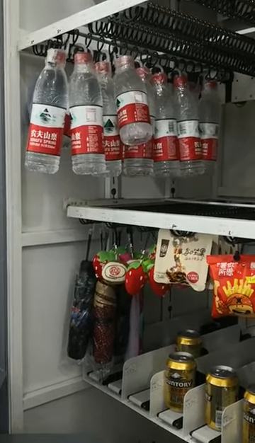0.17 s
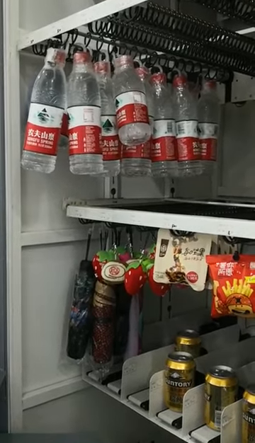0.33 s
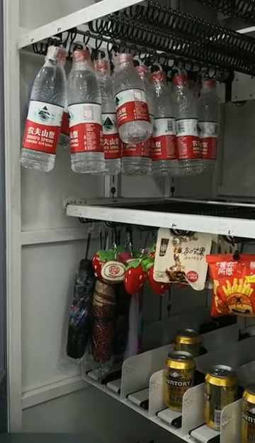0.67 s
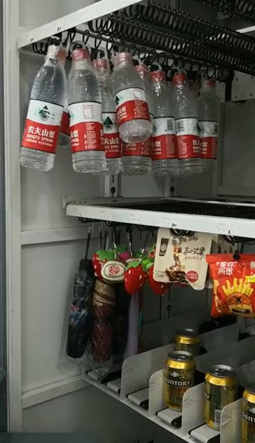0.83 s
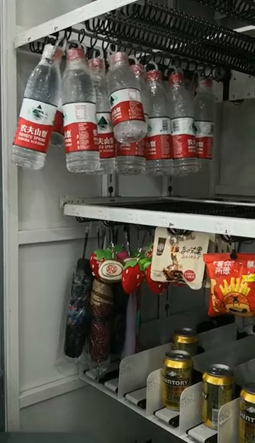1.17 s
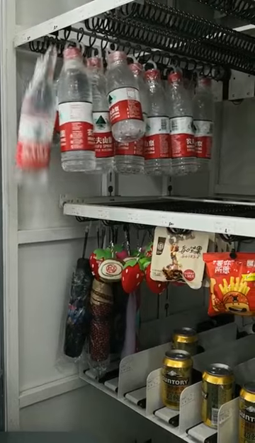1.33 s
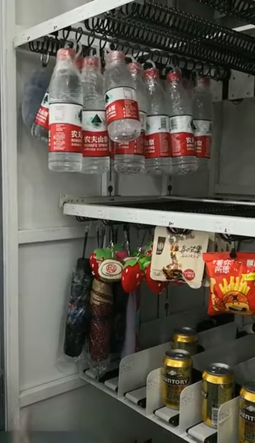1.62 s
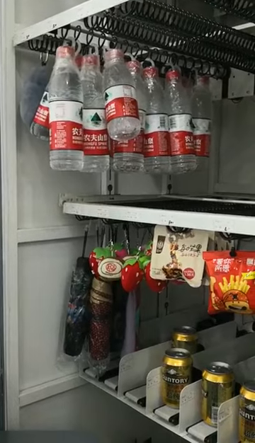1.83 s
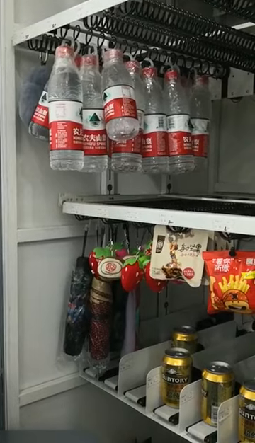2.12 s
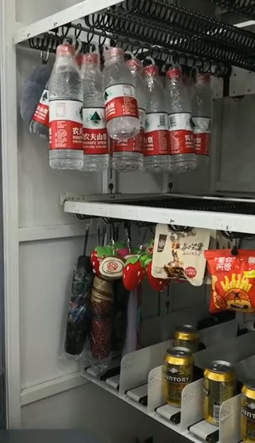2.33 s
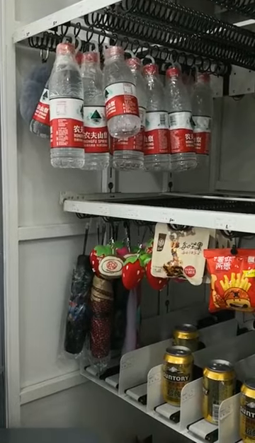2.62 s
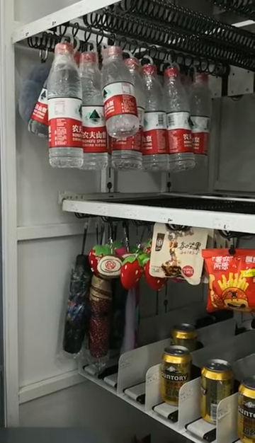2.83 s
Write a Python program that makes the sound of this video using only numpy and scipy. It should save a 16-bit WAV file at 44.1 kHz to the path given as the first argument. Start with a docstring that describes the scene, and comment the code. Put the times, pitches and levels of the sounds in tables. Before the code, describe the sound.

A vending machine's small geared motor whirs steadily with a brief squeak, then a filled plastic bottle crashes into the sheet-metal bin and tumbles; the motor stops and restarts. Close stereo microphone, muffled top treble, boxy metal cabinet.

```python
"""A small geared motor whirs in a vending machine: sines locked to its shaft, gear noise, brush hiss.
The wire spiral it turns squeaks, a tone gliding along a curve of pitch.
A bottle drops into the sheet-metal bin, bounces and tumbles: each blow excites decaying modes and noise.
The motor cuts out during the crash and spins up again with a growl as the bottle settles.
A faint, uneven rumble of filtered noise lies beneath."""
import sys
import numpy as np
from scipy import signal
from scipy.fft import rfft, irfft, next_fast_len
from scipy.io import wavfile
from scipy.ndimage import uniform_filter1d, map_coordinates

SR = 44100
rng = np.random.default_rng(int(sys.argv[2]) if len(sys.argv) > 2 else 0)


def file_out(sig):
    """Save sig as 16-bit WAV at sys.argv[1]."""
    # one column per channel
    cols = np.atleast_2d(sig).T
    # limit, then scale
    lim = np.clip(cols, -1, 1)
    pcm = np.round(lim * 32767).astype(np.int16)
    wavfile.write(sys.argv[1], SR, pcm)


N = 131859
T = np.arange(N) / SR  # time of every sample in seconds


def amp(db):
    """Amplitude ratio: 20 dB is a factor of ten."""
    return np.exp(np.asarray(db) * (np.log(10) / 20))


def unit(x):
    """Normalization: scale to rms 1."""
    return x / np.sqrt(np.mean(x ** 2) + 1e-20)


def along(points, hz):
    """Interpolation of (Hz, value) points on a logarithmic frequency axis."""
    f, value = np.transpose(points)
    return np.interp(np.log(hz + 1), np.log(f + 1), value)


def colour(points):
    """Spectral envelope: the gain response of a (Hz, dB) table."""
    return lambda hz: amp(along(points, hz))


def curves(rows):
    """Linear interpolation in time: one curve for each column after the seconds."""
    seconds, *columns = np.transpose(rows)
    return [np.interp(T, seconds, column) for column in columns]


def wobble(rate):
    """Band-limited randomness: a smooth spline through random knots, rate of them a second."""
    coarse = T[::8]
    knots = rng.standard_normal(int(N * rate / SR) + 4)
    return np.interp(T, coarse, map_coordinates(knots, [coarse * rate]))


def filtered(x, response):
    """Linear filtering: multiply the spectrum by a response of frequency."""
    m = next_fast_len(N + SR // 2)
    return irfft(rfft(x, m) * response(np.fft.rfftfreq(m, 1 / SR)), m)[..., :N]


def pan(db):
    """Level difference between ears: left gains db, right loses it."""
    return amp([[db], [-db]])


def texture(response, width, spiky=0):
    """Superposed tiny contacts: stereo noise of rms 1; spiky spreads their sizes, 0 is a smooth rush."""
    ticks = rng.standard_normal((2, N)) * np.exp(spiky * wobble(900))

    def mid_side(hz):
        turn = np.arctan(amp(along(width, hz)))
        return response(hz) * np.array([np.cos(turn), np.sin(turn)])

    mid, side = filtered(ticks, mid_side)
    return unit(np.array([mid + side, mid - side]))


def tone(phase, rough, rate):
    """Narrow-band modulation: a sine of about rms 1 whose size and phase waver."""
    in_phase = (1 + rough * wobble(rate)) * np.sin(phase)
    quadrature = rough * wobble(rate) * np.cos(phase)
    return np.sqrt(2) * (in_phase + quadrature) / np.sqrt(1 + 2 * rough ** 2)


def whistle(rows, rough, rate):
    """Frequency modulation: a rough tone whose phase integrates a (s, Hz, dB) curve."""
    hz, db = curves(rows)
    sounding = (T > rows[0][0]) & (T < rows[-1][0])
    return sounding * amp(db) * tone(2 * np.pi * np.cumsum(hz) / SR, rough, rate)


RISE_S = 0.0079  # time constant of a blow's rise


def strike(s, t60, rise_s=RISE_S):
    """Exponential decay: the envelope of one blow, a quick rise and 60 dB of fall per t60."""
    t = np.maximum(T - s, 0)
    return (1 - np.exp(-t / rise_s)) * amp(-60 * t / t60)


def patchy(x, depth_db):
    """Spectro-temporal modulation: smoothed random gain over time and frequency."""
    spectra = signal.stft(x, nperseg=512)[2]
    field = rng.standard_normal(spectra.shape[1:])
    field = uniform_filter1d(field, size=3, axis=0)  # over frequency
    field = uniform_filter1d(field, size=7, axis=1)  # over time
    return unit(signal.istft(spectra * amp(depth_db * unit(field)), nperseg=512)[1][:, :N])


PORT_PHASE = 0.91  # radians between left and right for the motor's tones


def shaft_tone(phase, levels_db, rough):
    """Interaural phase: one motor tone, at its own level and phase on the left and right."""
    start = rng.uniform(0, 2 * np.pi)
    return np.array([amp(db) * tone(phase + start + port * PORT_PHASE, rough, rate=45)
                     for port, db in enumerate(levels_db)])


# Tones of the turning shaft. Each row: multiple of the shaft rate (rounded to a half when played),
# left level in dB, right level in dB, before the load.
SHAFT_TONES = [(1, -56, -56.5), (4, -75.5, -74), (7, -60.5, -61), (7.5, -58, -59.5), (9, -62, -56),
               (11, -57.5, -56.5), (12, -57.5, -56.5), (14, -60, -54.5), (15, -49, -59.5), (17, -46, -46),
               (18, -49, -45), (19, -51.5, -49), (21, -56, -47.5), (22, -58, -58.5), (25, -58.5, -57.5),
               (39.78, -41, -37)]
# The clean tone of the armature slots, one row: multiple of the shaft rate, left and right level in dB.
SLOT_TONE = (10, -44.5, -38.5)
# Level of these tones, following the load. Each row: time in seconds, level in dB.
LOAD = [(0, -2), (.55, -0.5), (.9, -1), (1.3, 0), (1.45, -2), (1.65, 1), (2.65, -5.5), (2.8, -4.5),
        (3, -6.5)]
TONE_ROUGH, SLOT_ROUGH = .48, .17


def shaft_tones(shaft):
    """Harmonic series: sines at multiples and half multiples of the shaft rate."""
    tones = shaft_tone(SLOT_TONE[0] * shaft, SLOT_TONE[1:], SLOT_ROUGH)
    for multiple, *levels_db in SHAFT_TONES:
        tones = tones + shaft_tone(np.round(2 * multiple) / 2 * shaft, levels_db, TONE_ROUGH)
    return amp(curves(LOAD)[0]) * tones


# Relative level of the gear whine. Each row: time in seconds, level in dB.
WHINE_LEVEL = [(0, 0.5), (.13, -3.5), (.4, 0.5), (.68, 1.5), (.82, 0.5), (.87, -6.5), (.96, 2.5),
               (1.25, 1.5), (1.45, -7), (1.58, 0), (1.75, -5), (2.62, 2.5), (2.72, -6.5), (2.81, 1.5),
               (3, -5.5)]
MESH_ORDER, MESH_DB, MESH_ROUGH = 20, (-35, -32), .2  # multiple of the shaft rate; left, right dB
GEAR_RATIO = .283  # turns of the next wheel per shaft turn
GEAR_SWAY, GEAR_SWING, SHAFT_SWING = .52, .17, .12  # phase in radians; two depths of level swing
WHINE_ONSET = 5  # the whine grows with this power of the speed


def gear_whine(shaft, running):
    """Tooth meshing: a tone whose phase and size an off-centre wheel modulates."""
    wheel = GEAR_RATIO * shaft + .5 * wobble(16)
    mesh = shaft_tone(MESH_ORDER * shaft + GEAR_SWAY * np.sin(wheel), MESH_DB, MESH_ROUGH)
    swing = 1 + GEAR_SWING * np.cos(wheel) + SHAFT_SWING * np.sin(2 * shaft)
    return running ** WHINE_ONSET * amp(curves(WHINE_LEVEL)[0]) * mesh * swing


# Spectrum of the gear noise. Each row: frequency in Hz, relative density in dB.
GEARS = [(300, -35), (1000, -34), (1350, -22.5), (1650, -4.5), (1950, -9.5), (2300, -10.5), (2800, -4.5),
         (3250, 2.5), (3480, -7), (3750, -5), (4200, -7), (7000, -20.5)]
# Stereo width of the motor's noise. Each row: frequency in Hz, side against mid in dB.
MOTOR_WIDTH = [(60, -29.5), (120, -29), (250, -15.5), (500, 5.5), (1000, 0), (2020, 0), (4090, 2.5),
               (8270, -8)]
GEARS_DB = -33  # before flutter, load and pan


def gear_noise():
    """Random tooth contact: coloured noise whose level flutters and follows the load."""
    flutter = amp(GEARS_DB + 1.1 * wobble(60))
    return amp(curves(LOAD)[0]) * flutter * texture(colour(GEARS), MOTOR_WIDTH, spiky=0.05)


# Moments when the brush hiss drops out briefly. Each row: time in seconds, depth in dB.
HISS_DIPS = [(.205, 6), (.345, 13.5), (.538, 3.5), (.622, 10.5), (.918, 7.5), (1.2, 8.5), (1.605, 10),
             (1.668, 7)]
DIP_S = 0.008  # half-width of a dip, to 1/e of its depth


def brush_contact():
    """Amplitude modulation: the gain of the brush hiss flutters, with brief dropouts."""
    dips_db = sum(depth * np.exp(-((T - s) / DIP_S) ** 2) for s, depth in HISS_DIPS)
    return amp(1.3 * np.tanh(wobble(70)) + 0.7 * np.tanh(wobble(400)) - dips_db)


# Spectrum of the brush hiss. Each row: frequency in Hz, relative density in dB.
BRUSH = [(1500, -45.5), (3000, -21), (4000, -22.5), (4500, -8.5), (4850, -1.5), (5250, -9), (6000, -6),
         (6500, -4.5), (6750, -3.5), (6950, 6), (7150, 3.5), (7350, 1), (7600, -6.5)]
BRUSH_DB = -25  # before flutter and pan


def brush_hiss():
    """Sliding friction: coloured noise under the varying brush contact."""
    return amp(BRUSH_DB) * brush_contact() * texture(colour(BRUSH), MOTOR_WIDTH, spiky=0.053)


# The motor's speed when powered. Each row: time in seconds, shaft speed in Hz before jitter.
SPEED = [(0, 162.2), (.2, 161.5), (.42, 161.1), (.58, 161.5), (.87, 160.2), (.97, 160.9), (1.2, 161),
         (1.4, 161.8), (1.7, 163.5), (2.8, 163.5), (3, 162.8)]
STOP_S, RESTART_S = 1.93, 2.592
COAST_S, SPIN_UP_S, SWITCH_S = 0.096, 0.028, 0.008  # time constants: slowing, speeding up, noise return
JITTER_HZ, HISS_PAN_DB = .12, -1


def motor():
    """Rotational inertia: speed falls and rises exponentially, and every tone follows the shaft angle."""
    since = np.maximum(T - RESTART_S, 0)
    coast = np.exp(-np.maximum(T - STOP_S, 0) / COAST_S)
    running = coast + 1 - np.exp(-since / SPIN_UP_S)
    powered = coast + 1 - np.exp(-since / SWITCH_S)
    shaft_hz = running * (curves(SPEED)[0] + JITTER_HZ * wobble(40))
    shaft = 2 * np.pi * np.cumsum(shaft_hz) / SR
    tones = running * (shaft_tones(shaft) + gear_whine(shaft, running))
    return tones + powered * (gear_noise() + brush_hiss()) * pan(HISS_PAN_DB)


# Spectrum of the starting growl. Each row: frequency in Hz, relative density in dB.
STRAIN = [(500, -31), (1200, -12.5), (1650, -4.5), (2200, -1.5), (3000, -2), (3700, -17.5), (7000, -33.5)]
# A rough whistle that falls as the motor spins up.
# Each row: time in seconds, frequency in Hz, level in dB before the jerks.
RESTART_WHISTLE = [(2.595, 1943, -41), (2.625, 1720, -37), (2.652, 1597, -31), (2.668, 1405, -45.5),
                   (2.73, 1160, -48)]
STRAIN_DB, STRAIN_T60 = -24.5, 0.4  # before envelope and jerks; decay in seconds
STRAIN_PULSE_HZ, STRAIN_PULSE = 98, 0.45  # the teeth take up the load in jerks: mean rate, depth


def strain():
    """Periodic loading: the gears growl in jerks as the motor starts again, with a falling whistle."""
    jerks = 1 + STRAIN_PULSE * np.sin(2 * np.pi * STRAIN_PULSE_HZ * T + wobble(40))
    envelope = amp(STRAIN_DB) * strike(RESTART_S, STRAIN_T60, rise_s=.03)
    growl = envelope * texture(colour(STRAIN), MOTOR_WIDTH, spiky=.25)
    return jerks * (growl + whistle(RESTART_WHISTLE, rough=1.2, rate=350))


# Spiral squeak: one long slip, then two short chirps.
# Each row: time in seconds, frequency in Hz, level in dB.
SQUEAK = [(.62, 1975, -62), (.69, 1931, -41), (.73, 1933, -38), (.765, 1942, -33.5), (.79, 1950, -39),
          (.813, 1965, -36.5), (.826, 1965, -55), (.838, 1945, -34), (.855, 2005, -43), (.876, 1985, -36.5),
          (.895, 1960, -62)]


def squeak():
    """Frictional tone: the turning spiral rubs on a hanger."""
    return whistle(SQUEAK, rough=.15, rate=70)


TAIL_T60 = 1.224  # seconds, the cabinet's echo


def shaking(times, levels_db, t60, echo_db):
    """Energy addition: what the blows leave in the machine, with the cabinet's longer echo."""
    energy = sum(amp(2 * db) * (strike(s, t60) ** 2 + amp(2 * echo_db) * strike(s, TAIL_T60) ** 2)
                 for s, db in zip(times, levels_db))
    return np.sqrt(energy)


# Cabinet panels. Each row: frequency in Hz, relative level in dB, t60 in seconds.
PANELS = [(44.44, -0.5, .85), (56.8, -2, 0.59), (71.9, -0.5, 0.5), (89.2, -4, 0.61)]
BOOM_SCATTER_DB = 1.2


def boom(times, levels_db):
    """Modal excitation: every blow starts the low panel modes afresh as decaying sines."""
    return sum(amp(db + level + rng.normal(0, BOOM_SCATTER_DB))
               * strike(s, t60) * np.sin(2 * np.pi * hz * (T - s))
               for s, db in zip(times, levels_db) for hz, level, t60 in PANELS)


# Bin resonances. Each row: centre in Hz, width in Hz, relative level in dB.
BIN = [(118, 14, -0.5), (163, 20, 0.5), (205.3, 28, -3), (289.6, 32, -5), (343.2, 18, -1.5),
       (438, 28, -9.5), (507, 29, -8.5), (720, 11, -3.5)]


def bin_response(f):
    """Resonance: a sum of second-order band-passes of alternating sign."""
    return sum((-1) ** k * amp(db) * 1j * f * w / (c * c - f * f + 1j * f * w)
               for k, (c, w, db) in enumerate(BIN))


# Ring of bin and racks at every blow. Each row: frequency in Hz, relative level in dB, t60 in seconds.
RINGS = [(517, -14.5, 0.66), (732, -17.5, 0.44), (1750, -17.5, 0.17), (2140, -14.5, 0.75),
         (2720, -19, 0.42), (2809, -16, .4)]


def ringing(times, levels_db):
    """Free vibration: metal modes, struck anew by every blow with random size and phase."""
    out, t = np.zeros((2, N + SR)), np.arange(SR // 2) / SR
    for s, db in zip(times, levels_db):
        for hz, level, t60 in RINGS:
            size = amp(db + level + rng.normal(0, 1.8, (2, 1)))
            phase = rng.uniform(0, 2 * np.pi, (2, 1))
            envelope = (1 - np.exp(-t / RISE_S)) * amp(-60 * t / t60)
            start = int(s * SR)
            out[:, start:start + len(t)] += size * envelope * np.sin(2 * np.pi * hz * t + phase)
    return out[:, :N]


# Bottle blows. Each row: time in seconds, then relative boom, thud, clatter and crackle levels in dB.
BLOWS = [(1.693, -42, -34, -26, -37), (1.709, -25, -25, -19, -20.5), (1.722, -44.5, -23, -17.5, -23),
         (1.785, -27, -16.5, -16.5, -25.5), (1.826, -25, -22.5, -17, -21), (1.892, -28.5, -18.5, -19, -39),
         (1.935, -27.5, -21.5, -28, -54), (1.985, -37, -18.5, -20.5, -28.5),
         (2.044, -17.5, -19, -19.5, -27.5), (2.078, -28, -25, -22, -26.5), (2.124, -20, -19, -27, -50.5),
         (2.192, -16, -22, -24, -34.5), (2.229, -31.5, -24, -18.5, -23.5), (2.251, -27, -18, -20, -30),
         (2.289, -32, -20.5, -33.5, -40.5), (2.374, -26.5, -21.5, -26.5, -48),
         (2.41, -42, -26.5, -37.5, -55), (2.496, -24.5, -39, -53, -50), (2.588, -22, -28, -40, -51),
         (2.622, -38, -25, -32.5, -49), (2.72, -32.5, -40, -38.5, -57), (2.838, -32, -42, -42.5, -57)]
# Spectrum of the thud. Each row: frequency in Hz, relative density in dB.
THUD = [(40, -39), (110, -8), (200, -2.5), (340, -6.5), (450, -11), (900, -13.5), (2000, -35)]
# Spectrum of the rack clatter. Each row: frequency in Hz, relative density in dB.
CLATTER = [(150, -20.5), (450, -4), (750, -4.5), (1150, -3), (1500, 0), (1800, 1.5), (2500, 1.5),
           (3200, -2.5), (4800, -10.5), (5400, -16), (7500, -32.5)]
# Spectrum of the plastic crackle. Each row: frequency in Hz, relative density in dB.
CRACKLE = [(1500, -36), (3000, -12), (4000, 2), (4900, 0.5), (5300, -4), (6400, -3), (7200, 4.5),
           (7600, -5)]
# Stereo width of the crash. Each row: frequency in Hz, side against mid in dB.
CRASH_WIDTH = [(60, -22.5), (100, -36.5), (180, -24), (310, -5.5), (540, 5.5), (930, 2), (1600, -0.5),
               (2770, 1), (4780, -0.5), (8270, -3)]
# gains on top of the levels of the blows
BIN_DB, THUD_DB, CLATTER_DB, CRACKLE_DB, CRASH_PAN_DB = -2, -2.5, 2.5, 5.5, -1
THUD_T60, CLATTER_T60, CRACKLE_T60 = 0.34, 0.47, 0.31  # seconds
THUD_ECHO_DB, CLATTER_ECHO_DB, CRACKLE_ECHO_DB = -7.5, -9, -14  # against the direct part
PATCHY_DB = 2.43  # depth of the rattle's random unevenness over time and frequency


def crash():
    """Impact: each blow booms the panels, thuds in the bin, rattles the racks and crackles the plastic."""
    times, boom_db, thud_db, clatter_db, crackle_db = np.transpose(BLOWS)
    bin_noise = amp(BIN_DB) * texture(bin_response, CRASH_WIDTH, spiky=.4)
    thud_noise = amp(THUD_DB) * texture(colour(THUD), CRASH_WIDTH)
    thud = shaking(times, thud_db, THUD_T60, THUD_ECHO_DB) * (bin_noise + thud_noise)
    rattle = patchy(texture(colour(CLATTER), CRASH_WIDTH, spiky=0.15), PATCHY_DB)
    clatter = amp(CLATTER_DB) * shaking(times, clatter_db, CLATTER_T60, CLATTER_ECHO_DB) * rattle
    plastic = texture(colour(CRACKLE), CRASH_WIDTH, spiky=0.11)
    crackle = amp(CRACKLE_DB) * shaking(times, crackle_db, CRACKLE_T60, CRACKLE_ECHO_DB) * plastic
    bright = (clatter + crackle + ringing(times, clatter_db)) * pan(CRASH_PAN_DB)
    return boom(times, boom_db) + thud + bright


# Sharp cracks of the bottle wall.
# Each row: time in seconds, body level in dB, bright edge level in dB, before envelope and pan.
CRACKS = [(1.71, -12.5, -24), (1.832, -24, -7.5), (1.899, -20, -24), (1.962, -19.5, -39),
          (2.02, -18.5, -29), (2.165, -21, -29.5), (2.082, -16, -26.5), (2.255, -17.5, -21.5),
          (2.296, -22.5, -17.5), (2.42, -18.5, -41.5)]
CRACK_T60, CRACK_RISE_S = .11, 0.0041


def cracks():
    """Buckling: the bottle wall gives brief noise bursts during the tumble."""
    body = texture(colour(CLATTER), CRASH_WIDTH, spiky=.2)
    edge = texture(colour(CRACKLE), CRASH_WIDTH, spiky=0.18)
    bursts = sum(strike(s, CRACK_T60, CRACK_RISE_S) * (amp(body_db) * body + amp(edge_db) * edge)
                 for s, body_db, edge_db in CRACKS)
    return pan(CRASH_PAN_DB) * bursts


# Knocks that sound one panel or the bottle itself.
# Each row: start in seconds, frequency in Hz, level in dB before envelope and pan, t60 in seconds.
KNOCKS = [(1.704, 713, -22.5, .24), (1.709, 905, -27.5, 0.14), (1.706, 195.2, -23.5, 0.55),
          (1.829, 1044, -23.5, 0.11), (1.842, 570, -22.5, 0.082), (1.868, 830, -29, 0.098),
          (1.914, 341, -18, 0.53), (2.235, 345, -23.5, 0.28), (2.381, 152.3, -21, 0.5)]
KNOCK_PAN_DB = -1


def knocks():
    """Single-mode response: lone decaying resonances during the tumble."""
    modes = sum(amp(db) * strike(s, t60, rise_s=0.01) * tone(2 * np.pi * hz * T, rough=0.3, rate=60)
                for s, hz, db, t60 in KNOCKS)
    return pan(KNOCK_PAN_DB) * modes


# Dull bumps in the rack. Each row: start in seconds, frequency in Hz, level in dB before the envelope.
BUMPS = [(0.01, 162.2, -44), (0.01, 290, -57.5), (1.34, 203, -44.5)]
BUMP_T60, BUMP_ROUGH = .8, .3  # decay in seconds, roughness


def bumps():
    """Damped vibration: the loaded rack hums briefly when its goods shift."""
    return sum(amp(db) * strike(s, BUMP_T60, rise_s=0.016) * tone(2 * np.pi * hz * T, BUMP_ROUGH, rate=30)
               for s, hz, db in BUMPS)


# Spectrum of the rumble. Each row: frequency in Hz, relative density in dB.
ROOM = [(20, -8), (45, -1.5), (75, 3.5), (120, -9.5), (165, -1.5), (240, -11.5), (400, -19.5),
        (1000, -20.5), (3000, -30.5)]
# Low rumble of the cabinet. Each row: time in seconds, level in dB relative to ROOM_DB.
RUMBLE_LEVEL = [(0, -1.5), (.3, -3), (.6, -6), (.8, -1.5), (1.25, -2), (1.4, -1.5), (1.68, -0.5), (3, 11.5)]
ROOM_DB, ROOM_PATCHY_DB = -50.5, 3


def rumble():
    """Broadband vibration: low coloured noise, uneven over time and frequency."""
    noise = patchy(texture(colour(ROOM), MOTOR_WIDTH), ROOM_PATCHY_DB)
    return amp(ROOM_DB + curves(RUMBLE_LEVEL)[0]) * noise


def scene():
    """Superposition: the machine and the bottle over the faint rumble."""
    machine = motor() + strain() + squeak()
    bottle = crash() + cracks() + knocks()
    return machine + bottle + bumps() + rumble()


CEILING, TOP_HZ = .85, 7540  # amplitude that peaks approach before the band limit; band limit


def record(dry):
    """Saturation and band limiting: the microphone rounds the highest peaks and drops the top treble."""
    rounded = dry / (1 + np.abs(dry / CEILING) ** 6) ** (1 / 6)
    return filtered(rounded, lambda hz: hz < TOP_HZ)


dry = scene()
out = record(dry)
file_out(out)
```